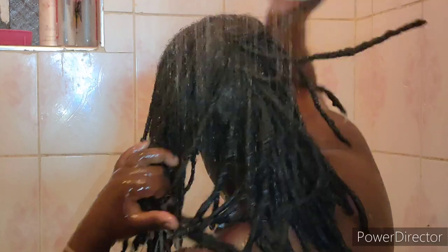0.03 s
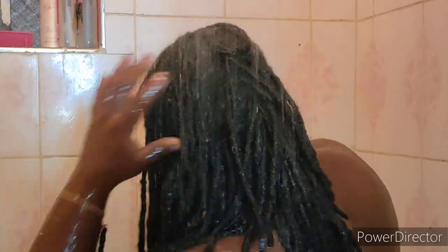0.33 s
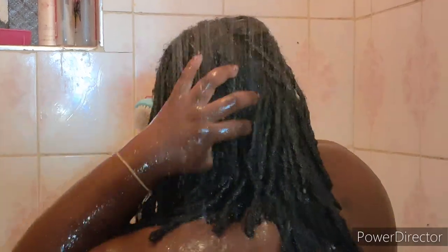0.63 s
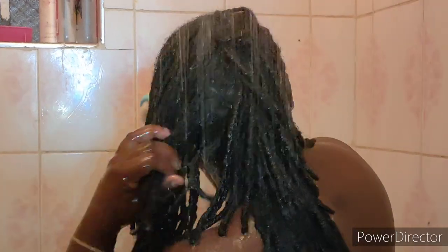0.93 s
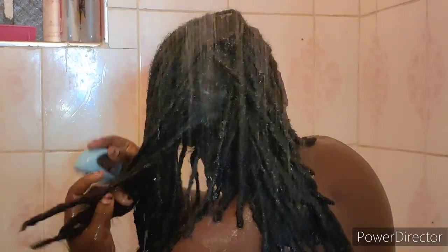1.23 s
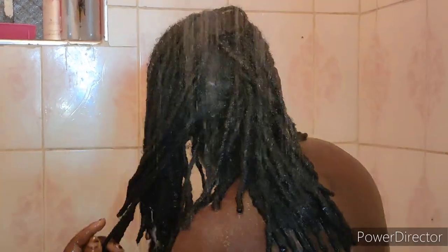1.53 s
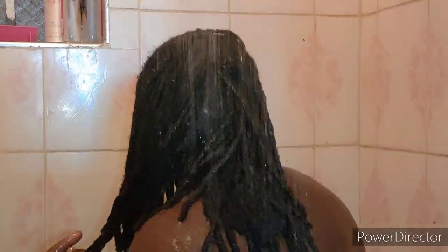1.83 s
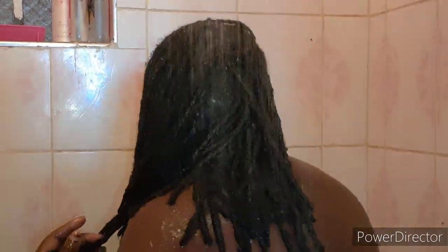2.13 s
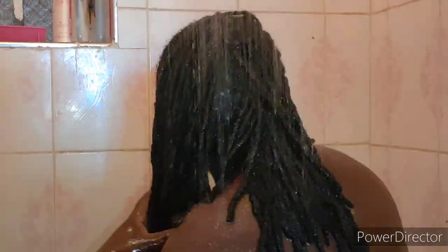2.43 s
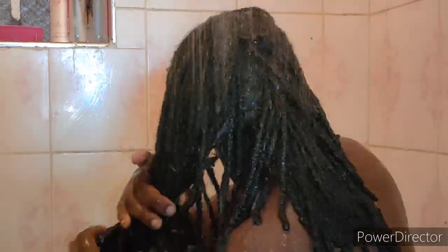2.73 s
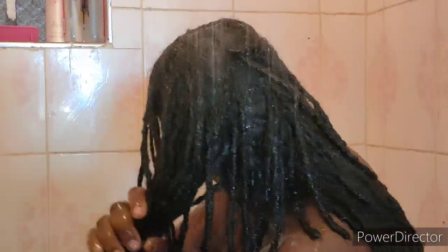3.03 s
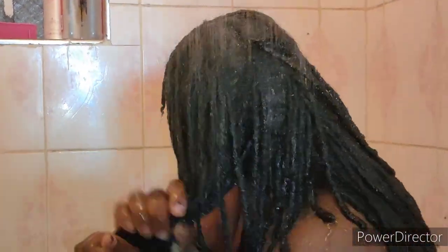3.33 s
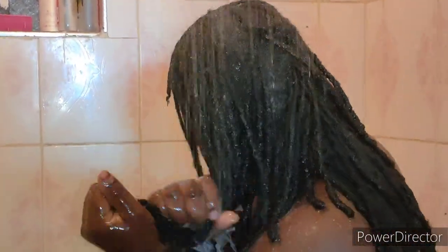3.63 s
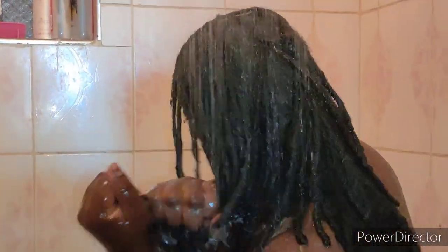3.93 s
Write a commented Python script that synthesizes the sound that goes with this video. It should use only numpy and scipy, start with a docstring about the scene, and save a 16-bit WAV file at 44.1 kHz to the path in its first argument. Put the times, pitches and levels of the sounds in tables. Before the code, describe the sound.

Shower water falling steadily on wet hair, with splashes slapping the tiles.

```python
"""Shower spray drums steadily on wet hair in a small tiled room and rings the stall's resonances.
Run-off patters on the floor, heavy drops tick, bubbles ring and fine droplets sizzle on the walls.
As hands lift and squeeze the hair, dollops fall and slap the tiles, ringing briefly in the room.
Automatic gain control ducks at the biggest splash and recovers slowly."""
import sys
import numpy as np
from scipy import signal
from scipy.fft import rfft, irfft
from scipy.io import wavfile
from scipy.ndimage import uniform_filter1d

SR = 44100
rng = np.random.default_rng(int(sys.argv[2]) if len(sys.argv) > 2 else 0)


def file_out(sig):
    """Save sig as 16-bit WAV at sys.argv[1]."""
    # one column per channel
    cols = np.atleast_2d(sig).T
    # limit, then scale
    lim = np.clip(cols, -1, 1)
    pcm = np.round(lim * 32767).astype(np.int16)
    wavfile.write(sys.argv[1], SR, pcm)


N = 4 * SR

# spray spectrum on the head: freq_hz, gain_db
SPRAY_SPECTRUM = [(30, -25), (60, -23.5), (135, -24), (180, -23.5), (225, -8.5), (280, -2), (400, -5),
                  (450, -7.5), (560, -5.5), (770, -5.5), (900, -8), (1020, 1), (1300, -1.5), (1480, -4),
                  (2050, -2), (2350, -8.5), (3200, -19.5), (5500, -13), (8000, -86)]
# spray as the head moves under it: time_s, level_db
SPRAY_ENVELOPE = [(0, -27), (.8, -27), (1.3, -27), (1.9, -26), (2.5, -27), (2.9, -26), (3.4, -25), (4, -27)]
# left/right likeness of the spray: freq_hz, correlation (clipped in use)
SPRAY_CORRELATION = [(60, 4.3), (250, 0.8), (650, 0.78), (1100, -0.13), (2300, 0), (8000, 1)]
# stall resonances: freq_hz, width_hz, lift_db
STALL_RESONANCES = [(260, 18, 8), (295, 10, 6), (338, 18, 5.5), (396, 16, 3.5), (503, 26, 5), (545, 20, 4),
                    (621, 20, 4.5), (721, 20, 3), (1014, 20, 3), (1070, 20, 2.5), (1287, 18, 3),
                    (1690, 40, 2.5)]
# spectrum of drops on the floor: freq_hz, gain_db
FLOOR_SPECTRUM = [(1200, -37), (2400, -2), (3200, 1), (4000, 3.5), (4900, 4), (5600, 1.5), (6200, -1),
                  (6900, -12), (7900, -22.5), (10000, -61)]
# floor patter: time_s, level_db
PATTER_ENVELOPE = [(0, -31.5), (.3, -29.5), (.65, -33.5), (1, -29.5), (1.22, -34.5), (1.5, -28), (1.8, -29),
                   (2.06, -30.5), (2.3, -29.5), (2.51, -31.5), (2.64, -20), (2.8, -24.5), (2.95, -27),
                   (3.148, -24.5), (3.24, -30), (3.32, -30), (3.45, -32), (3.68, -29.5), (3.85, -27),
                   (4, -24.5)]
# dollops on the tiles: start_s, level_db, centre_hz, width_oct, decay_s, mist_db, hardness
DOLLOPS = [ (.091, -28.5, 3700, 0.32, 0.009, -47.5, 0.4), (0.194, -31, 6070, 0.25, 0.036, -51, 0.5),
           (.346, -19, 3420, 0.2, 0.022, -63, 0.1), (.510, -25.5, 3900, 0.28, 0.016, -53, 0.5),
           (0.664, -35, 5340, 0.073, 0.011, -50, 0.3), (.773, -29.5, 5440, 0.24, 0.031, -60, 0.3),
           (0.805, -27.5, 4200, 0.15, 0.019, -58, 0.4), (0.94, -28, 5900, 0.2, 0.014, -52, 0.36),
           (1.540, -39, 4500, 0.55, 0.021, -40, 0), (1.864, -25, 5260, 0.32, 0.026, -36.5, 0.7),
           (1.893, -23, 4240, 0.29, 0.017, -64, 0.34), (2.171, -28, 5300, 0.12, 0.026, -67, 0.3),
           (2.225, -27.5, 3500, 0.35, 0.017, -50, 0.34), (2.394, -26, 5570, 0.24, 0.024, -50, 0.38),
           (2.520, -22.5, 3930, 0.42, 0.01, -55, 1), (2.546, -24.5, 4100, 0.4, 0.0037, -58, .6),
           (2.574, -11.5, 5260, 0.3, 0.032, -34, 0.75), (2.606, -19.5, 2530, 0.35, 0.018, -54, 0.64),
           (2.678, -24.5, 3070, 0.26, 0.021, -50, 0.54), (2.692, -15.5, 3850, 0.13, 0.026, -39, 0.6),
           (2.712, -19.5, 3500, 0.21, 0.0086, -45, 0.9), (2.763, -19.5, 4000, 0.15, 0.025, -43, 0.7),
           (2.847, -20.5, 3380, 0.14, 0.019, -62, 0.7), (3.03, -23, 3400, 0.28, 0.031, -82, 0.4),
           (3.168, -29, 4550, 0.091, 0.012, -53, 0.4), (3.269, -30.5, 5230, 0.075, 0.022, -65, .3),
           (3.577, -29.5, 4930, 0.14, 0.013, -56, 0.3), (3.727, -26, 3040, 0.36, 0.0092, -58, 0.13),
           (3.786, -27, 3560, 0.23, 0.01, -55, 0.7), (3.967, -22.5, 5600, 0.27, 0.031, -48, 0.7)]
# spectrum common to all slaps: freq_hz, gain_db
SLAP_SPECTRUM = [(300, -35), (1500, -0.5), (3000, 3), (4100, 1.5), (4800, 0.5), (5700, 3), (6500, -6),
                 (7200, -7.5), (8000, -19), (12000, -18)]
# spectrum of the finest droplets: freq_hz, gain_db
MIST_SPECTRUM = [(4000, -4), (7900, -7.5), (9000, 1), (11000, 3.5), (13700, 0), (15500, -4.5)]
# large puddle bubbles, tiny trickle bubbles: rate_per_s, low_hz, high_hz, decay_cycles, level_db
BUBBLE_GROUPS = [(107.4, 1150, 2600, 11.4, -41), (173, 3200, 5400, 37, -41)]
# hand knocks on the hair: start_s, level_db
GRAB_KNOCKS = [(2.503, -39), (2.535, -43), (2.546, -38), (2.561, -35)]
# droplet hiss: time_s, level_db
HISS_ENVELOPE = [(0, -45), (.12, -50), (.36, -50.5), (.52, -46), (.64, -55), (.85, -45.5), (1.05, -49.5),
                 (1.23, -56.5), (1.42, -43.5), (1.68, -48.5), (2.04, -50), (2.29, -43.5), (2.75, -49),
                 (2.92, -50.5), (3.13, -43.5), (3.4, -52.5), (3.6, -46.5), (4, -45.5)]
# stereo lean: freq_hz, left_over_right_db
STEREO_LEAN = [(110, 0), (230, 1.5), (400, 1), (700, -1), (1200, -2), (2300, 0.5), (4300, -2), (6500, -2),
               (8500, 8.5), (12000, 0.5)]


def spray():
    """Thousands of fine jets drum on the hair; the bass is alike at both ears."""
    mid, side = (room(impacts(rate_per_s=7000, spread_db=2.52), wet=0.26)[0] for _ in range(2))
    hz = bins_hz(mid)
    correlation = np.clip(at_hz(SPRAY_CORRELATION, hz), -0.98, 0.98)
    common = rfft(mid) * np.sqrt(1 + correlation)
    opposed = rfft(side) * np.sqrt(1 - correlation)
    ears = irfft(np.array([common + opposed, common - opposed]), N)
    drumming = unit_rms(equalise(stall(ears), SPRAY_SPECTRUM))
    return drumming * undb(at_samples(SPRAY_ENVELOPE) + wander_db(spread_db=0.5, rate_hz=3.7))


def stall(x):
    """Stall resonances ring on top of x; each swells and fades as the body moves."""
    hz, spectrum, rings = bins_hz(x), rfft(x), 0
    for mode_hz, width_hz, lift_db in STALL_RESONANCES:
        ring = irfft(spectrum / (1 + 2j * (hz - mode_hz) / width_hz), N)
        rings += ring * (undb(lift_db) - 1) * undb(wander_db(spread_db=2.5, rate_hz=4))
    return x + rings


def patter():
    """Run-off hits the floor in uneven trickles, each with its own pitch."""
    spectrum = 0
    for centre_hz in np.geomspace(2200, 7800, num=13):
        hits = impacts(rate_per_s=320, spread_db=1.04) * undb(wander_db(spread_db=5, rate_hz=8.6))
        spectrum += rfft(hits) * bell(bins_hz(hits), centre_hz, width_oct=0.081)
    trickles = unit_rms(equalise(room(irfft(spectrum, N), wet=0.83), FLOOR_SPECTRUM))
    return trickles * undb(at_samples(PATTER_ENVELOPE) + wander_db(spread_db=1.5, rate_hz=25))


def splashes():
    """Compact dollops crack on the tile, loose ones swell; droplets and a finer mist follow."""
    crack_db, skirt_db, swell_s, onset_s = 15, -14, 0.016, 0.079
    mist_rise_s, mist_decay_s = 0.0027, 0.03
    out, t = np.zeros((2, N)), np.arange(SR // 2) / SR
    end_fade = 1 - (t / t[-1]) ** 2

    def burst(envelope, spectrum, crack=0):
        droplets = impacts(rate_per_s=5000, spread_db=1, samples=len(t)) * envelope
        return equalise(room(droplets + crack, wet=0.8), spectrum)

    def unit_onset(x):
        return x / np.sqrt(np.mean(x[:, t < onset_s] ** 2))

    for start_s, level_db, centre_hz, width_oct, decay_s, mist_db, hardness in DOLLOPS:
        envelope = np.exp(-t / decay_s) * (1 - (1 - hardness) * np.exp(-t / swell_s))
        crack = hardness * undb(crack_db) * (t == 0)
        band = bell(bins_hz(t), centre_hz, width_oct) + undb(skirt_db)
        slap = filtered(burst(envelope, SLAP_SPECTRUM, crack), band)
        mist = burst((1 - np.exp(-t / mist_rise_s)) * np.exp(-t / mist_decay_s), MIST_SPECTRUM)
        splash = unit_onset(slap) * undb(level_db) + unit_onset(mist) * undb(mist_db)
        add(out, splash * end_fade, start_s)
    return out


def drips(rate_per_s=38, level_db=-37.5, scatter_db=10, low_hz=2750, high_hz=5760, decay_cycles=7):
    """Heavy drops leave the hair ends and tick on the tiles, each with its own pitch and size."""
    ticks, t = np.zeros(N), np.arange(SR // 50) / SR
    for when, pitch, smallness in rng.random((int(rate_per_s * N / SR), 3)):
        hz = low_hz * (high_hz / low_hz) ** pitch
        tick = np.exp(-t * hz / decay_cycles) * np.sin(2 * np.pi * hz * t)
        add(ticks, tick * undb(-scatter_db * smallness), when * N / SR)
    return unit_rms(equalise(room(ticks, wet=0.66), FLOOR_SPECTRUM)) * undb(level_db)


def bubbles(glide=0.0595):
    """Bubbles ring with slightly rising pitch in the water on the floor."""
    out, t = 0, np.arange(SR // 20) / SR
    for rate_per_s, low_hz, high_hz, decay_cycles, level_db in BUBBLE_GROUPS:
        rings = np.zeros(N)
        for when, pitch, size in rng.random((int(rate_per_s * N / SR), 3)):
            hz = low_hz * (high_hz / low_hz) ** pitch
            age = t * hz / decay_cycles
            phase_rad = 2 * np.pi * hz * t * (1 + glide * np.tanh(age / 2))
            add(rings, size ** 2 * np.exp(-age) * np.sin(phase_rad), when * N / SR)
        out += unit_rms(room(rings, wet=0.61)) * undb(level_db)
    return out


def grab(t60_s=0.11):
    """A rough run of dull knocks as the hand closes on heavy wet hair."""
    out, t = np.zeros(N), np.arange(SR // 4) / SR
    band = bell(bins_hz(t), centre_hz=170, width_oct=0.57)
    for start_s, level_db in GRAB_KNOCKS:
        knock = unit_rms(filtered(rng.standard_normal(len(t)), band))
        add(out, knock * undb(level_db - 60 * t / t60_s), start_s)
    return out


def hiss():
    """The finest droplets rebound from the hair and sizzle on the walls."""
    droplets = room(impacts(rate_per_s=3000, spread_db=6.2), wet=0.83)
    return unit_rms(equalise(droplets, MIST_SPECTRUM)) * undb(at_samples(HISS_ENVELOPE))


def room(x, wet, t60_s=0.45, gap_s=0.0016, early_decay_s=0.009, early_db=8):
    """Direct sound, early reflections and tail off the tiles, per ear; wet is the echo's energy share."""
    t = np.arange(SR // 2) / SR
    decay = undb(-60 * t / t60_s) + undb(early_db) * np.exp(-t / early_decay_s)
    tail = rng.standard_normal((2, len(t))) * decay * (t > gap_s)
    response = tail * np.sqrt(wet / np.sum(tail ** 2, axis=1, keepdims=True))
    for ear in response:
        direct_delay_samples = rng.integers(24)
        ear[direct_delay_samples] += np.sqrt(1 - wet)
    return signal.fftconvolve(x[None], response, axes=1)[:, :len(x)]


def impacts(rate_per_s, spread_db, samples=N):
    """Random drop impulses, many small and a few large."""
    hits = rng.random(samples) < rate_per_s / SR
    signs = rng.choice([-1, 1], samples)
    return hits * signs * undb(spread_db * np.minimum(rng.exponential(size=samples), 5))


def wander_db(spread_db, rate_hz):
    """Smooth random level drift, spread_db rms."""
    noise = rng.standard_normal(N)
    return spread_db * unit_rms(filtered(noise, np.exp(-(bins_hz(noise) / rate_hz) ** 2)))


def undb(db):
    """Decibels to gain."""
    return 10 ** (np.asarray(db) / 20)


def unit_rms(x):
    """Scale to rms 1."""
    return x / np.sqrt(np.mean(x ** 2) + 1e-18)


def bins_hz(x):
    """FFT bin frequencies, floored at 1 Hz."""
    return np.maximum(np.fft.rfftfreq(x.shape[-1], 1 / SR), 1)


def at_hz(points, hz):
    """Interpolate (freq_hz, value) points on a log axis."""
    freqs_hz, values = np.array(points, float).T
    return np.interp(np.log(hz), np.log(freqs_hz), values)


def at_samples(points):
    """Interpolate (time_s, value) points at every sample."""
    return np.interp(np.arange(N) / SR, *np.array(points).T)


def bell(hz, centre_hz, width_oct):
    """Gaussian band on a log axis."""
    return np.exp(-(np.log2(hz / centre_hz) / (2 * width_oct)) ** 2)


def filtered(x, gain):
    """Apply one gain per FFT bin."""
    return irfft(rfft(x) * gain, x.shape[-1])


def equalise(x, points):
    """Filter by (freq_hz, gain_db) points."""
    return filtered(x, undb(at_hz(points, bins_hz(x))))


def add(out, x, start_s):
    """Mix x into out at start_s."""
    first = int(start_s * SR)
    count = min(x.shape[-1], N - first)
    out[..., first:first + count] += x[..., :count]


def scene():
    """All sources, leaning left or right by frequency."""
    mix = spray() + patter() + splashes() + drips() + bubbles() + grab() + hiss()
    lean_db = at_hz(STEREO_LEAN, bins_hz(mix))
    return filtered(mix, undb([lean_db / 2, -lean_db / 2]))


def record(dry):
    """Gain control ducks fast above a threshold and releases slowly; then clip and low-pass."""
    threshold_db, slope, attack_s, release_s, cutoff_hz = -20.5, 0.8, 0.07, 0.87, 15100
    hop = SR // 1000
    power = uniform_filter1d(np.mean(dry ** 2, axis=0), SR // 100)[::hop]
    level_db = 10 * np.log10(power + 1e-12)
    duck_db, ducks_db = 0, []
    for target_db in np.maximum(level_db - threshold_db, 0) * slope:
        lag_s = attack_s if target_db > duck_db else release_s
        duck_db += (target_db - duck_db) * hop / SR / lag_s
        ducks_db.append(duck_db)
    gain = undb(-np.interp(np.arange(N) / hop, np.arange(len(ducks_db)), ducks_db))
    lowpass = signal.ellip(8, 0.2, 70, cutoff_hz, fs=SR, output="sos")
    return signal.sosfilt(lowpass, np.clip(dry * gain, -1, 1))


dry = scene()
out = record(dry)
file_out(out)
```